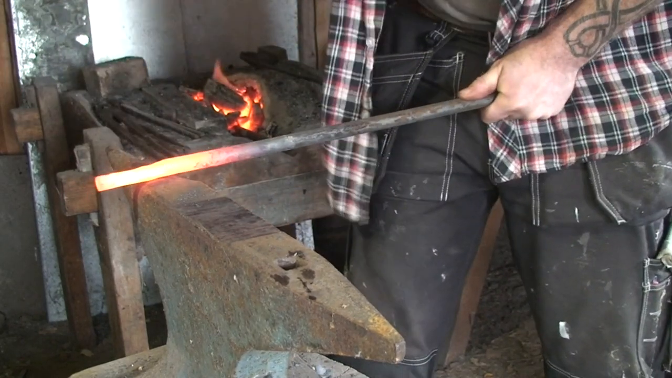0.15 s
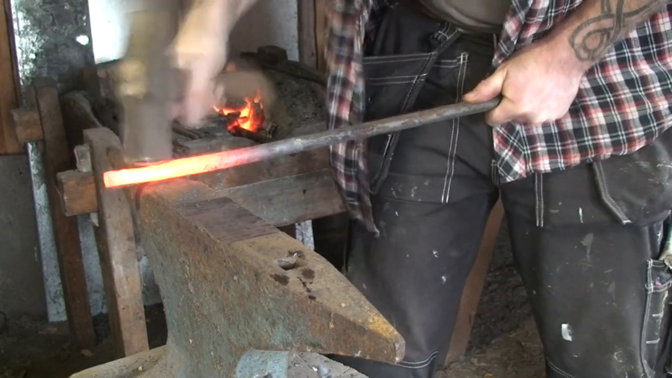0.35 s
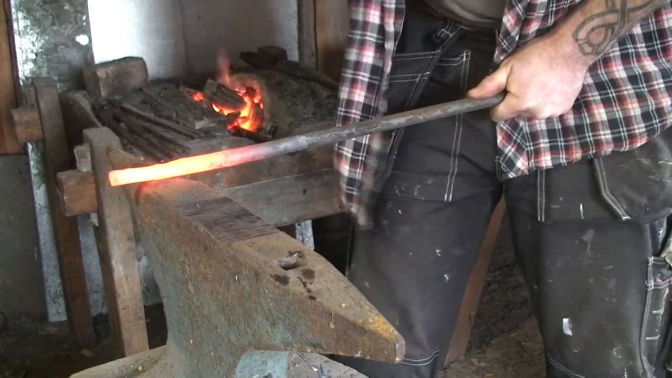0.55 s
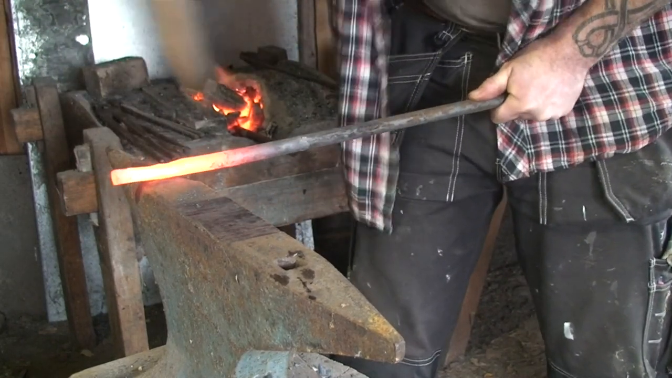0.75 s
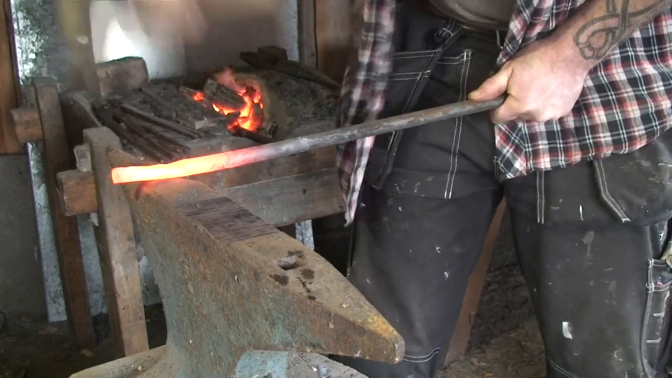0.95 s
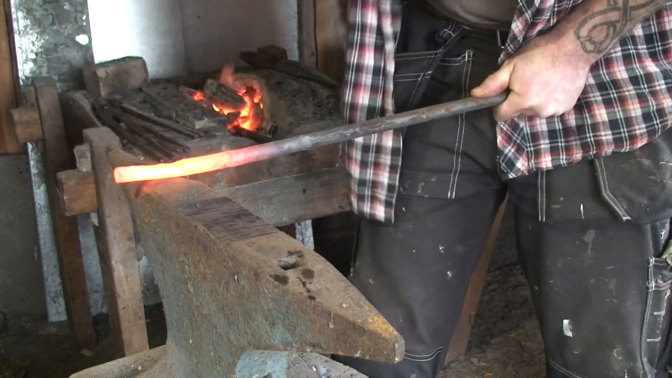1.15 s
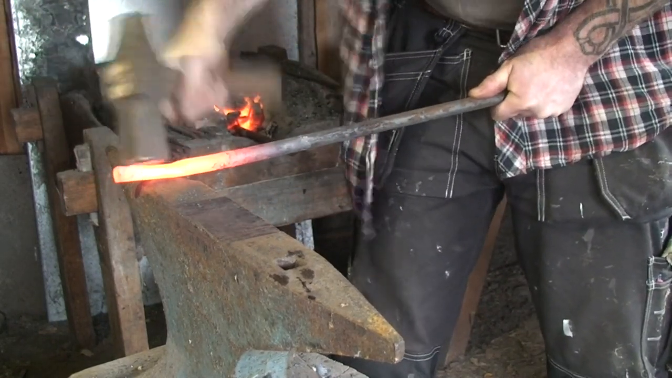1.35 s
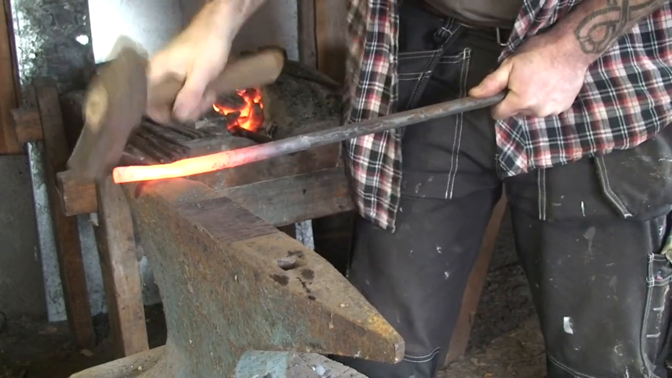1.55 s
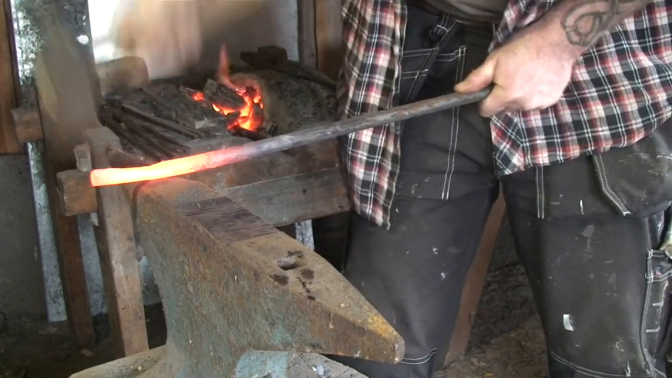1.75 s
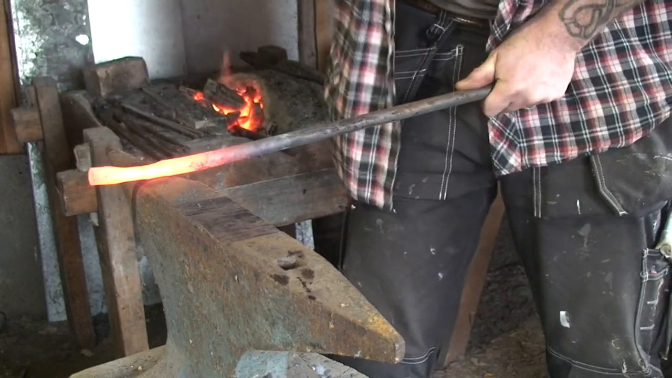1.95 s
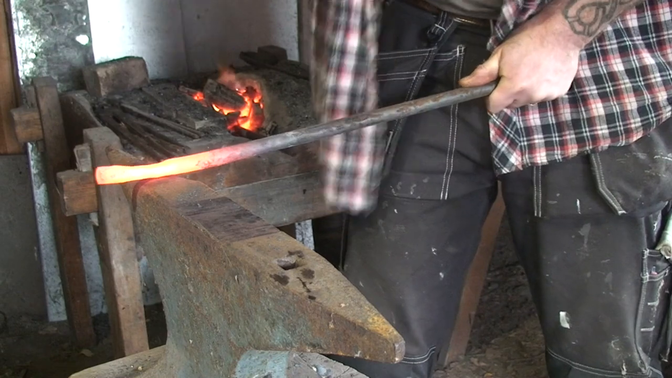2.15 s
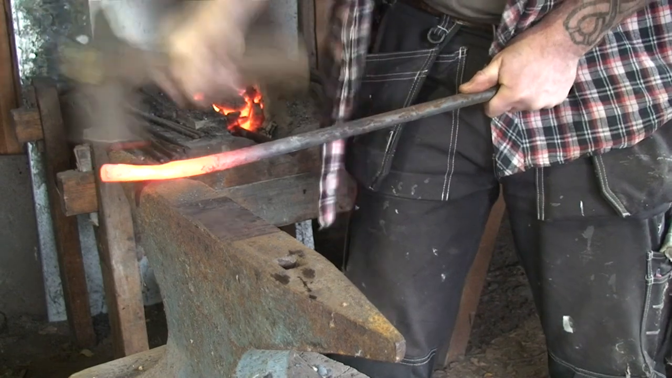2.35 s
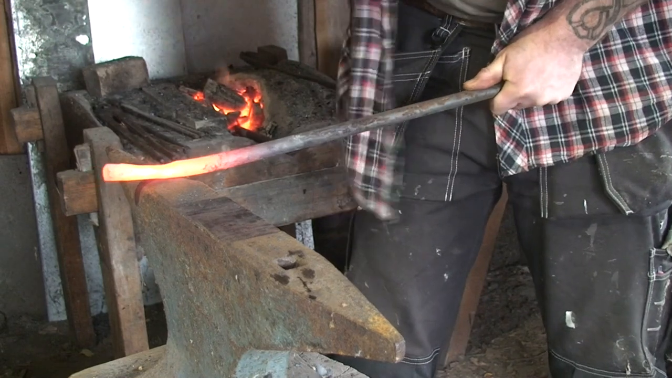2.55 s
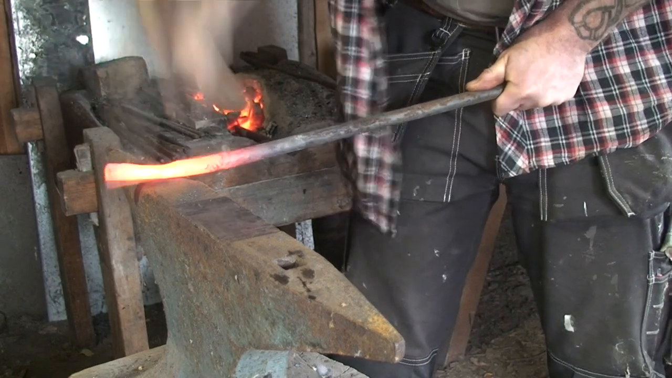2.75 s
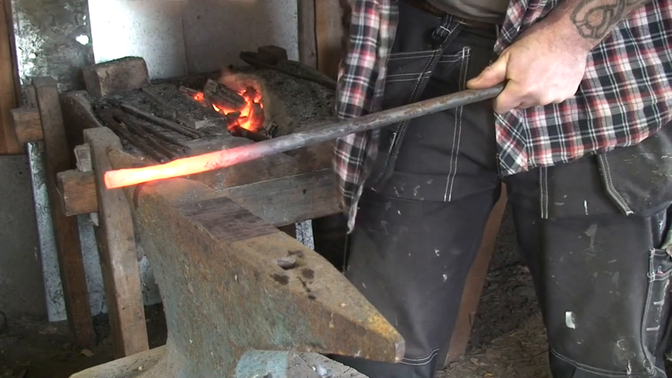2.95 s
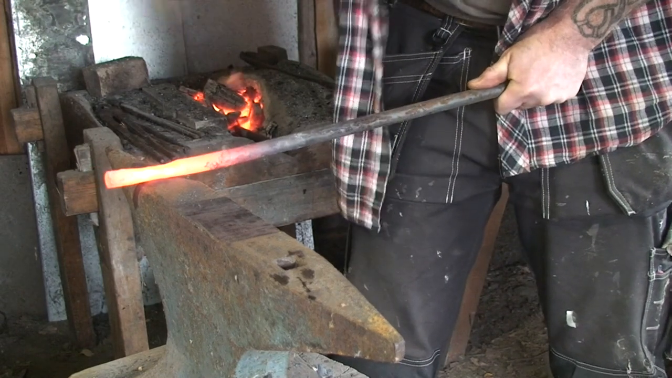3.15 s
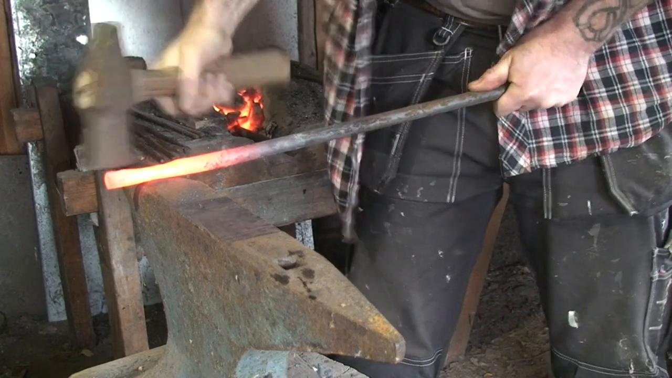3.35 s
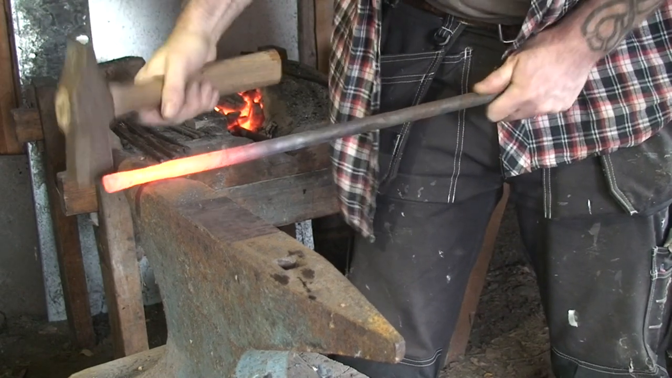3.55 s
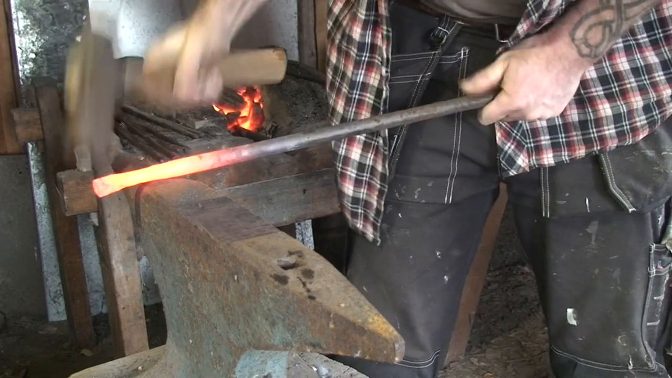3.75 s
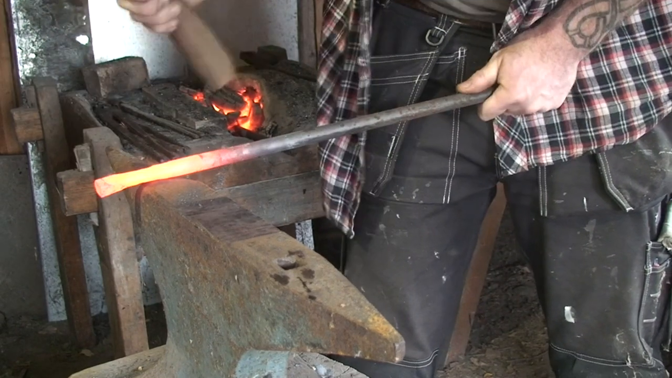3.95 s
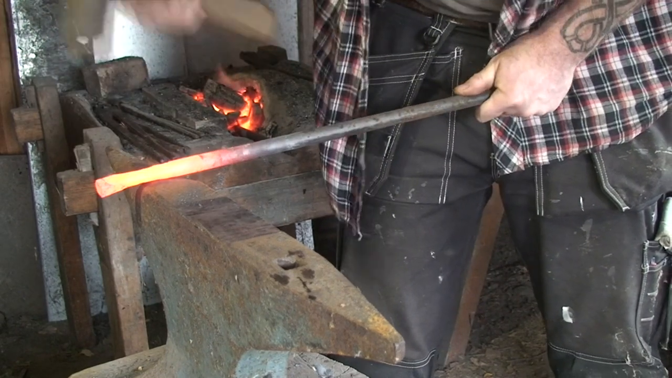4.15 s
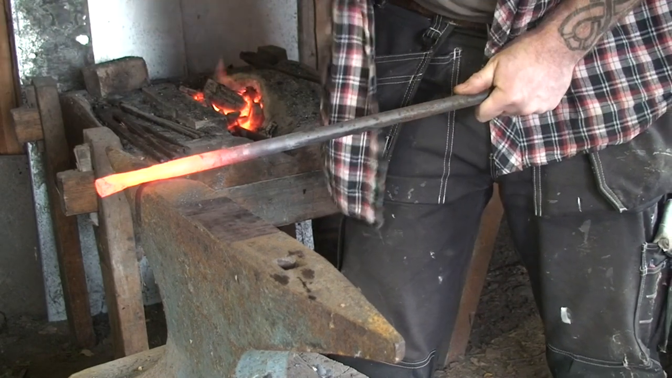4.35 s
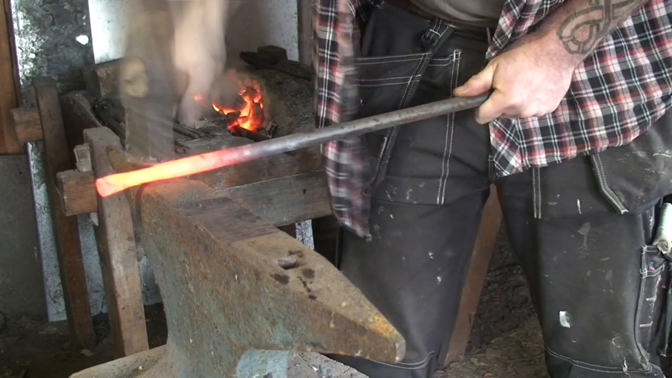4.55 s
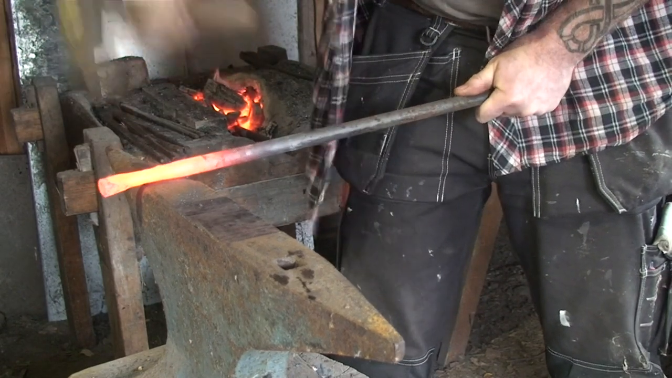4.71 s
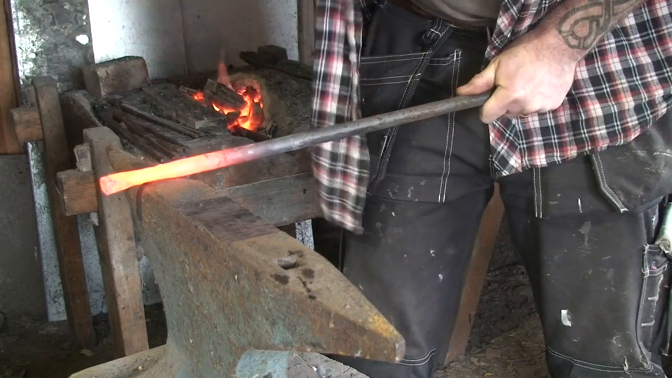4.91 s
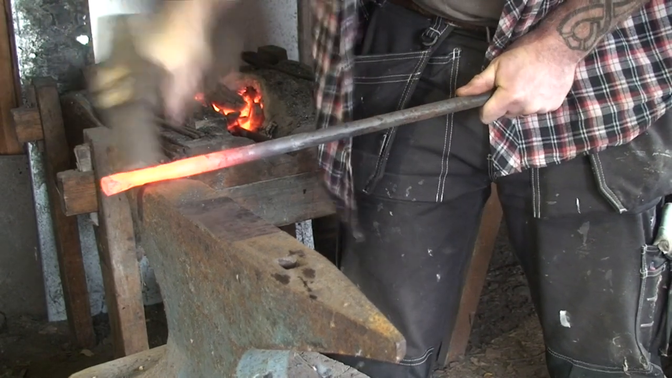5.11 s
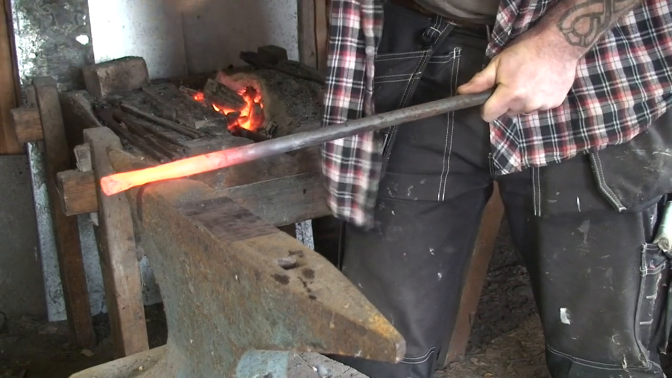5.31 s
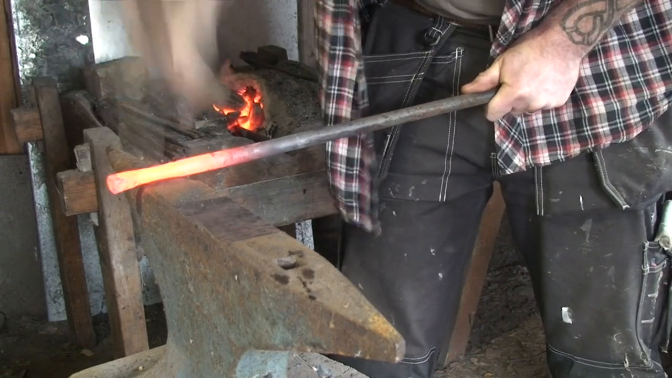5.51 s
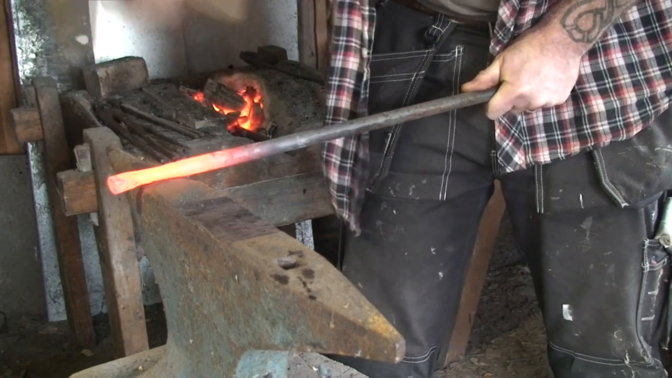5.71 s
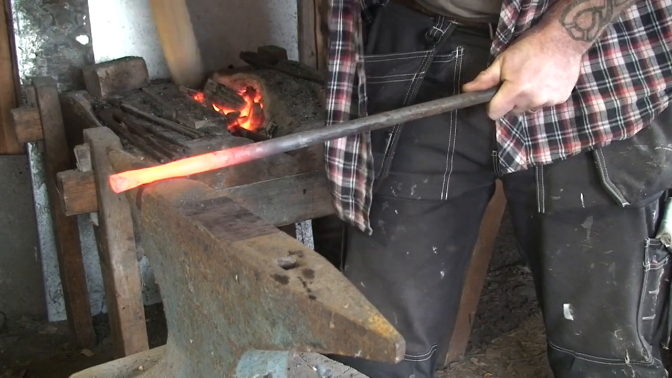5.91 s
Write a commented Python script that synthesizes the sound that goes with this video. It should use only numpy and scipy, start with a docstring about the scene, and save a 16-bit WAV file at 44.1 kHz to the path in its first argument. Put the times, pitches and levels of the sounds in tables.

```python
"""An anvil is already ringing from a blow just before the start; more blows follow, three or four to a round.
A smith draws out a red-hot bar in a small workshop: each blow is a sliding thump, noise and damped modes.
Between rounds the hammer drops on the bare face and bounces, exciting the same anvil modes more in step.
Ticks, flakes and sliding grit are shaped noise; a forge blower hums behind as wavering sines over air noise.
A gain control ducks at each blow, so the ring hangs level while it recovers."""
import sys
import numpy as np
from scipy import signal
from scipy.fft import rfft, irfft
from scipy.io import wavfile
from scipy.ndimage import uniform_filter1d, minimum_filter1d

SR = 44100
rng = np.random.default_rng(int(sys.argv[2]) if len(sys.argv) > 2 else 0)


def master_out(mix):
    """Clip the mix to full scale and print it as 16-bit PCM to the path in sys.argv[1]."""
    frames = np.transpose(np.atleast_2d(mix))
    ceiling = np.clip(frames, -1, 1)
    pcm = np.round(ceiling * 32767).astype(np.int16)
    wavfile.write(sys.argv[1], SR, pcm)


N = 263277
T = np.arange(N) / SR
RING = T[:SR]  # one second of age for each struck sound
HZ = np.maximum(np.fft.rfftfreq(SR, 1 / SR), 1)

# Blows on the bar. Each row: start in seconds, force in dB, extra level of the anvil's low note in dB,
# extra level of its shimmer in dB, shimmer centre in Hz.
BLOWS = [(-.11, 8, 14, 15.5, 8000), (.375, -6, 6.5, 19.5, 8980), (.845, 1.5, 12.5, 13.5, 9400),
         (1.318, 2.5, 9.5, 9, 8000), (2.332, -4, 3.5, 16, 8160), (2.8041, -7.5, -4, 23.5, 9400),
         (2.845, -24.5, 0, 19.5, 9250), (3.291, -4, 9.5, 22.5, 8460), (4.591, -5, 3.5, 13.5, 8660),
         (5.090, -2.5, -5.5, 18, 8750), (5.5633, -3, 6.5, 5.5, 8530)]
# Anvil stand and held bar. Each row: mode in Hz, level in dB, t60 in seconds.
STAND_MODES = [(111, -33.5, 0.11), (178.3, -22.5, 0.35), (223.4, -17, 0.25), (244.5, -1, .16),
               (341, -16.5, 0.27), (422, -6, 0.21), (565, 2, 0.12), (571, -14, 0.21), (669, -10, 0.26),
               (743.5, 1, 0.12), (815, 1.5, 0.049), (916, -14.5, 0.3)]


def blows(contact_s=0.00025, crack_db=0, crack_t60_s=0.11, bright_db=4.5, dulling_db_per_db=0.24,
          middle_db=(5.5, 5.5), middle_scatter_db=3.5, body_db=-1.62, body_db_per_db=0.74):
    """Each blow: thump, crack of breaking scale, clatter, stand and anvil; all but the thump grow slowly with force."""
    out = np.zeros((2, N))
    contact = 1 - np.exp(-RING / contact_s)
    crack_colour = [(100, -23.5), (900, 0.5), (5000, -14.0), (12000, -22.5), (16000, -40)]  # (Hz, dB)
    for start_s, force_db, note_db, shimmer_db, shimmer_hz in BLOWS:
        crack = undb(crack_db) * noise(crack_colour, size=SR) * fade(crack_t60_s)
        # a harder blow sinks deeper into the soft iron and clatters duller
        chatter = clatter(bright_db - dulling_db_per_db * force_db)
        # second and third anvil modes
        middle = np.array(middle_db) + middle_scatter_db * rng.standard_normal(2)
        fed_db = [note_db, *middle, *shimmer(shimmer_db, shimmer_hz)]
        body = crack + chatter + ring(STAND_MODES) + anvil(start_s, fed_db)
        body_gain = undb(body_db + body_db_per_db * force_db)
        add(out, start_s, thump(force_db) + body_gain * contact * body)
    return out


def thump(force_db, start_hz=1500, end_hz=190, yield_s=0.001363, peak_s=0.0016, db=13,
          quickness=1.09, quicken_octaves_per_db=0.075):
    """Hammer sinks into soft iron: a shove of a few cycles, slowing as it yields; harder is shorter and higher."""
    quick = quickness * 2 ** (quicken_octaves_per_db * force_db)  # scales all pitches and rates
    hz = quick * (end_hz + (start_hz - end_hz) * np.exp(-quick * RING / yield_s))
    age = quick * RING / peak_s
    envelope = (age * np.exp(1 - age)) ** 2
    return undb(db + force_db) * envelope * np.sin(2 * np.pi * np.cumsum(hz) / SR)


# Anvil modes, six leading ones first. Each row: mode in Hz, level in dB, t60 in seconds,
# phase between the ears in radians.
ANVIL_MODES = [(2047, -24.5, .68, -.3), (2710, -12, .17, 0), (3677, -25, .33, -.2), (7990, -44, .95, -.1),
               (8497, -28, .34, 0), (9380, -27, .52, -2.5), (1575, -16, .14, .4), (3423, -26, .13, -.6),
               (4135, -28, .16, .7), (4450, -4, .16, .3), (5280, -20, .15, .6), (6052, -20, .18, -.4),
               (6460, -24, .15, .8), (7000, -33, .32, -.6), (7380, -29, .16, .5), (8200, -21, .14, -.9),
               (9162, -26, .18, 1.1), (10750, -22, .13, .2), (11978, -32, .33, 0), (12110, -39, .26, .3)]
# Hammer resting on the face, draining the ring. Each row: start in seconds, end in seconds,
# extra loss in dB per second.
RESTS = [(1.76, 1.9, 22), (3.462, 3.82, 209)]


def anvil(start_s, fed_db, in_step=False, twin_db=-4, split_hz=55, twin_t60_s=0.072):
    """Anvil modes, each beating at first against a short-lived twin; bare steel starts them in step."""
    twins = [(hz + split_hz, db + twin_db, twin_t60_s, -lag) for hz, db, _, lag in ANVIL_MODES]
    modes = ring(ANVIL_MODES, fed_db, in_step=in_step) + ring(twins, fed_db, in_step=in_step)
    lost_db = 0
    for rest_s, lift_s, loss_db_s in RESTS:
        rested_s = np.clip(start_s + RING, rest_s, lift_s) - np.clip(start_s, rest_s, lift_s)
        lost_db = lost_db + loss_db_s * rested_s
    return modes * undb(-lost_db)


def shimmer(db, centre_hz, fall_db_per_khz=15, depth_db=11.5):
    """Extra dB of three leading high anvil modes: fed less away from the centre, down to a set depth."""
    away_khz = np.abs(np.array(ANVIL_MODES)[3:6, 0] - centre_hz) / 1000
    return db - np.minimum(fall_db_per_khz * away_khz, depth_db)


# Colour of a blow's clatter. Each row: frequency in Hz, density in dB per Hz.
CLATTER_COLOUR = [(40, -17.5), (100, -8.5), (220, -3.5), (380, -1), (620, 3), (1000, -3), (2000, -16),
                  (3200, -15), (5000, -17.5), (8000, -21.5), (10500, -24.5), (12500, -28.5), (15000, -61.5)]
# Length of the clatter. Each row: frequency in Hz, t60 in seconds.
CLATTER_T60 = [(100, 0.36), (400, 0.17), (1500, 0.17), (5000, 0.17), (13000, 0.13)]


def clatter(bright_db, peak_db=15, width_hz=20):
    """Bar and scale chatter on the face and keep feeding the anvil's resonances; the treble dies first."""
    peaks = sum(1 / (1 + ((HZ - hz) / width_hz) ** 2) for hz, *_ in ANVIL_MODES)
    resonance = np.sqrt(1 + undb(peak_db) ** 2 * peaks)
    tilt = undb(bright_db * HZ / (HZ + 2000))
    spectrum = rfft(noise(CLATTER_COLOUR, size=SR)) * resonance * tilt
    # overlapping bands, each with its own decay
    centres = np.log([hz for hz, _ in CLATTER_T60])
    out = np.zeros((2, SR))
    for row, (_, t60_s) in zip(np.eye(len(centres)), CLATTER_T60):
        share = np.interp(np.log(HZ), centres, row)
        out += irfft(spectrum * share, SR) * fade(t60_s)
    return out


# Hammer on the bare face. Each row: start in seconds, knock level in dB,
# extra level of the anvil's low note in dB, hardness of the contact 0-1.
TAPS = [(1.4954, -5, -3, 0.88), (1.535, -15.5, 7, 0), (1.614, -21, -12, 0.43), (1.670, -11.5, 4.5, 0),
        (3.3298, -10.5, 9.5, 0.76), (3.373, -16, -20, .3), (3.606, -38, -9.5, .1),
        (3.728, -42.5, -19.5, 0.24)]


def taps(upper_db=-25, upper_scatter_db=4, contact_s=0.001, soft_db=(-25.5, -14.5), hard_gain_db=(43, 18),
         clank_db=-19, clank_octaves=0.061, clank_t60_s=0.15):
    """Steel on steel: soft contact feeds the anvil's low note, hard contact clanks roughly at its second mode."""
    out = np.zeros((2, N))
    contact = 1 - np.exp(-RING / contact_s)
    for start_s, db, note_db, hardness in TAPS:
        # second and third modes against the low note: softest level plus gain with hardness
        gained_db = np.clip(hardness, 0, 1) * np.array(hard_gain_db)
        second_db, third_db = note_db + np.array(soft_db) + gained_db
        upper = db + upper_db + upper_scatter_db * rng.standard_normal(len(ANVIL_MODES) - 3)
        clank = undb(second_db + clank_db) * burst(ANVIL_MODES[1][0], clank_octaves, clank_t60_s)
        steel = anvil(start_s, [note_db, second_db, third_db, *upper], in_step=True)
        add(out, start_s, clank + contact * (undb(db) * knock() + steel))
    return out


# Colour of a tap's knock. Each row: frequency in Hz, density in dB per Hz.
KNOCK_COLOUR = [(60, -42.5), (200, -2), (480, -3.5), (900, -9), (1600, -4.5), (2400, -21), (3700, -25),
                (6000, -38.5), (14000, -58.5)]
# Hammer head and handle. Each row: mode in Hz, level in dB, t60 in seconds.
HAMMER_MODES = [(438.6, -3.5, 0.094), (522.2, -3, 0.17), (854, -9.5, 0.11), (1415, -17, 0.088),
                (1595, -6.5, 0.11)]


def knock(grain_db=-4, t60_s=0.12):
    """Hammer's own dull sound at one contact: dying noise plus head and handle modes."""
    return undb(grain_db) * noise(KNOCK_COLOUR, size=SR) * fade(t60_s) + ring(HAMMER_MODES, scatter_db=5.0)


# Hammer face chattering as it settles. Each row: start in seconds, end in seconds, level of one contact in dB,
# level of the handle's hum against it in dB.
RATTLES = [(3.401, 3.60, -48.5, 8), (3.609, 3.689, -41, -16)]


def rattles(lead_db=(15, 3, 12), upper_db=-12, count=10):
    """Runs of tiny, uneven bounces: one contact sound repeated at irregular times and levels."""
    out = np.zeros((2, N))
    fed_db = [*lead_db] + [upper_db] * (len(ANVIL_MODES) - len(lead_db))
    for start_s, end_s, db, hum_db in RATTLES:
        contacts = np.zeros(SR)
        places = (np.arange(count) + rng.random(count)) / count
        ages_s = np.clip(places * (end_s - start_s), 0, .5)
        contacts[(ages_s * SR).astype(int)] = undb(db + 2 * rng.standard_normal(count))
        hum = undb(hum_db) * burst(hz=535, octaves=0.11, t60_s=0.13)
        one = knock() + hum + anvil(start_s, fed_db)
        add(out, start_s, signal.fftconvolve(one, contacts[None], axes=1))
    return out


# Ticks and knocks around the anvil. Each row: start in seconds, level in dB, centre in Hz.
TICKS = [(0.748, -44.5, 9300), (0.765, -36, 4170), (3.776, -42.5, 7500), (4.127, -44, 654),
         (4.189, -50, 6750)]
# Bar sliding on the face as it is turned. Each row: centre in seconds, length in seconds, level in dB.
SLIDES = [(1.666, .16, -63.5), (2.066, 0.17, -56), (3.66, 0.55, -64)]
# Colour of the slide. Each row: frequency in Hz, density in dB per Hz.
SLIDE_COLOUR = [(500, -1), (2000, -3), (3800, 2), (7000, -4), (12000, -6), (16000, -19.5)]


def handling(grit_db=4, flake_count=6, flake_db=-60, flake_hz=8200, tick_octaves=0.68, tick_t60_s=0.085):
    """Small ticks, scale flakes dropping at random, and the gritty slide of the bar over loose scale."""
    out = np.zeros((2, N))
    flakes = [(s, flake_db, flake_hz) for s in rng.uniform(0, N / SR, flake_count)]
    for start_s, db, hz in TICKS + flakes:
        add(out, start_s, undb(db) * burst(hz, tick_octaves, tick_t60_s))
    pressure = sum(undb(db) * np.exp(-(2 * (T - s) / length_s) ** 2) for s, length_s, db in SLIDES)
    # grit level jumps every 128 samples
    grit = undb(grit_db * np.repeat(rng.standard_normal(N // 128 + 1), 128)[:N])
    return out + pressure * grit * noise(SLIDE_COLOUR, size=N)


# Blower tones. Each row: frequency in Hz, level in dB rms.
BLOWER_TONES = [(43.3, -53.5), (87, -67.5), (173, -71), (841, -65.5)]
# Colour of the shop air. Each row: frequency in Hz, density in dB per Hz.
SHOP_COLOUR = [(20, -42.5), (33, -26.5), (50, -12.5), (90, -17.5), (200, -22), (450, -18), (800, -21.5),
               (1700, -23.5), (5000, -33.5), (16000, -41.5)]


def forge(shop_db=-56, waver_db=1.7, drift_rad=.3):
    """Blower's hum and faint whine, wavering in level and phase, over the air of the shop."""
    out = undb(shop_db) * noise(SHOP_COLOUR, size=N, side_db=-5)
    knots_s = np.arange(0, 6.2, .125)
    for hz, db in BLOWER_TONES:
        swell, drift = (np.interp(T, knots_s, rng.standard_normal(len(knots_s))) for _ in range(2))
        tone = np.sqrt(2) * np.sin(2 * np.pi * hz * T + drift_rad * drift)
        out = out + undb(db + waver_db * swell) * tone
    return out


def workshop(dry, wet_db=-17, t60_s=0.27, damp_hz=1500):
    """A short, dull tail from the cluttered walls: convolution with dying noise."""
    colour = [(20, 0), (damp_hz, 0), (16000, -16)]
    tail = noise(colour, size=SR, side_db=-5.5) * fade(t60_s) * (1 - np.exp(-RING / 0.0022))
    # unit mean power gain below damp_hz
    tail = tail / np.sqrt(np.mean(np.abs(rfft(tail))[:, HZ < damp_hz] ** 2))
    return dry + undb(wet_db) * signal.fftconvolve(dry, tail, axes=1)[:, :N]


def ring(modes, extra_db=(), scatter_db=2, in_step=False):
    """Damped sines; the first modes are fed as given, the others by chance."""
    fed_db = scatter_db * rng.standard_normal(len(modes))
    fed_db[:len(extra_db)] = extra_db
    phases = np.zeros(len(modes)) if in_step else rng.uniform(0, 2 * np.pi, len(modes))
    out = np.zeros((2, SR))
    for (hz, db, t60_s, *lag), fed, phase in zip(modes, fed_db, phases):
        age = RING[:int(2 * t60_s * SR)]
        # a mode radiates in lobes, so the two ears may meet it out of step
        ears = np.array([[.5], [-.5]]) * lag[0] if lag else 0
        decay = np.exp(-np.log(1000) * age / t60_s)
        out[:, :len(age)] += undb(db + fed) * decay * np.sin(2 * np.pi * hz * age + phase + ears)
    return out


def burst(hz, octaves, t60_s, rise_s=.0008):
    """A dying band of noise around one pitch."""
    hump = [(hz * 2 ** (k * octaves), -6 * k * k) for k in range(-4, 5)]
    return noise(hump, size=SR) * fade(t60_s) * (1 - np.exp(-RING / rise_s))


def noise(points, size, side_db=-11):
    """Stereo noise of a given colour: shared part of rms 1, plus a weaker part opposed in the two ears."""
    hz = np.maximum(np.fft.rfftfreq(size, 1 / SR), 1)
    white = rng.standard_normal((2, size))
    mid, side = irfft(rfft(white) * undb(curve(points, hz)), size)
    return (mid + undb(side_db) * side * np.array([[1], [-1]])) / mid.std()


def fade(t60_s):
    """Exponential decay over one second."""
    return np.exp(-np.log(1000) * RING / max(t60_s, .002))


def curve(points, hz):
    """Read (Hz, value) points on a log-frequency axis."""
    f, value = np.transpose(points)
    return np.interp(np.log(hz), np.log(f), value)


def undb(db):
    """Decibels to gain."""
    return 10 ** (np.asarray(db) / 20)


def add(out, start_s, sound):
    """Mix a sound in at its start, cutting what falls outside."""
    start = int(round(start_s * SR))
    lo, hi = max(start, 0), min(start + sound.shape[-1], N)
    out[:, lo:hi] += sound[..., lo - start:hi - start]


def scene(left_db=2.3, centred_hz=4500):
    """Anvil a little to the left, its treble arriving evenly; forge behind."""
    iron = workshop(blows() + taps() + rattles() + handling())
    low = signal.sosfiltfilt(signal.butter(2, centred_hz, fs=SR, output="sos"), iron)
    pan = undb(np.array([[left_db], [-left_db]]) / 2)
    return iron - low + low * pan + forge()


def record(dry, ceiling=0.81, release_db_s=85, opening_db=13, top_hz=16000):
    """Gain control ducks at once under each peak, recovers at a steady rate in dB; then a steep low-pass."""
    over_db = 20 * np.log10(np.maximum(np.abs(dry).max(axis=0) / ceiling, 1))
    over_db[0] = max(over_db[0], opening_db)  # still ducked by the blow just before
    held_db = np.maximum.accumulate(over_db + release_db_s * T) - release_db_s * T
    gain = uniform_filter1d(minimum_filter1d(undb(-held_db), size=65), size=65)
    lowpass = signal.ellip(8, .2, 70, top_hz, fs=SR, output="sos")
    return signal.sosfilt(lowpass, dry * gain)


dry = scene()
out = record(dry)
master_out(out)
```